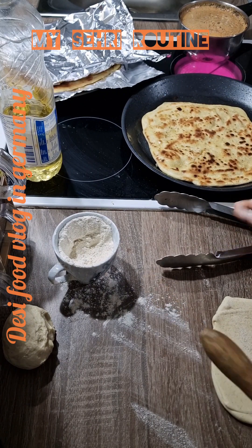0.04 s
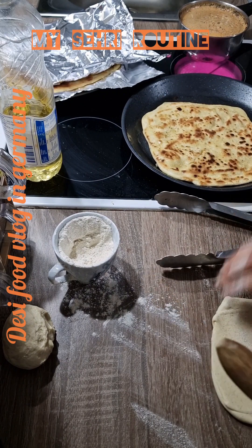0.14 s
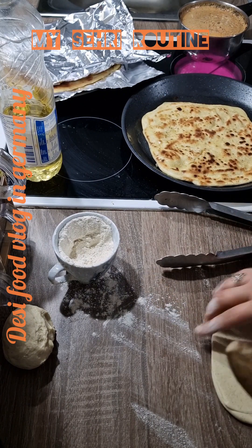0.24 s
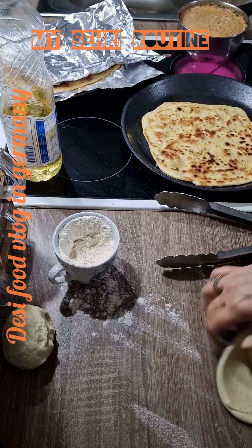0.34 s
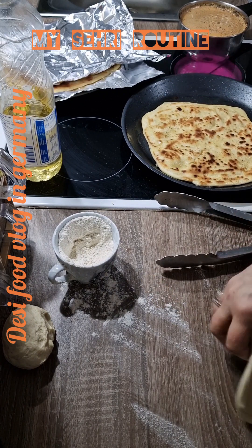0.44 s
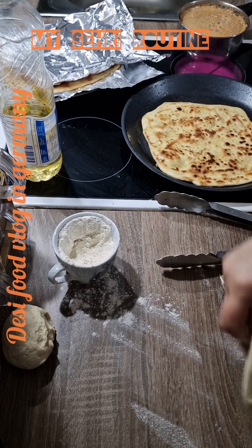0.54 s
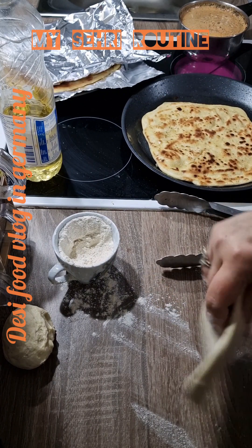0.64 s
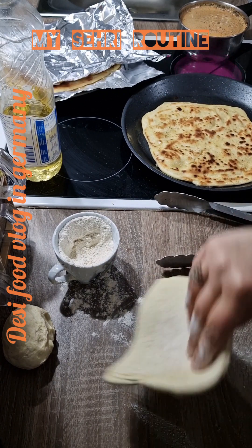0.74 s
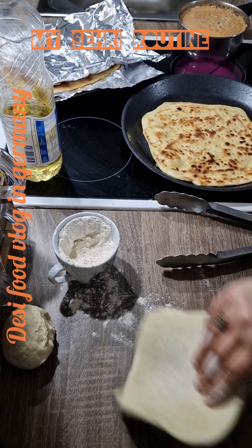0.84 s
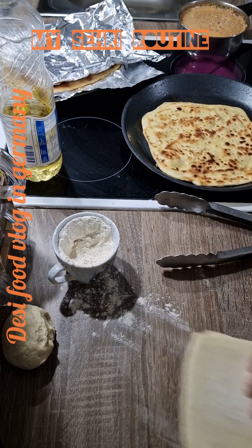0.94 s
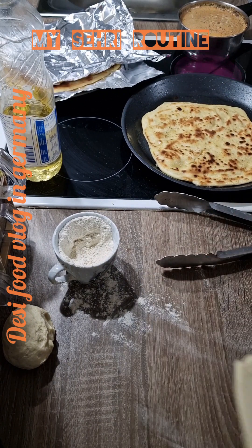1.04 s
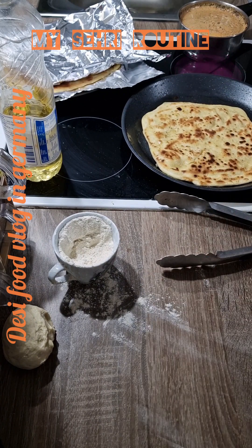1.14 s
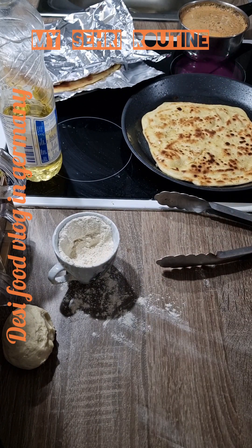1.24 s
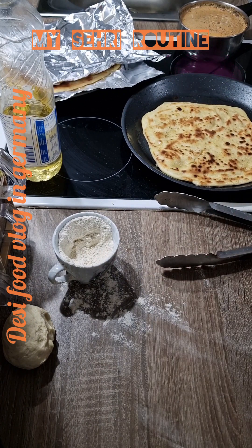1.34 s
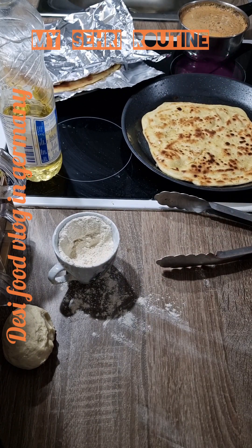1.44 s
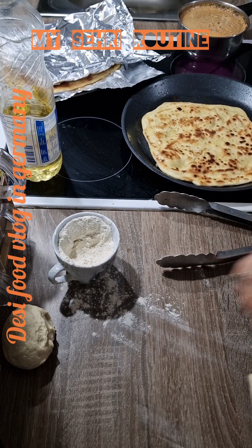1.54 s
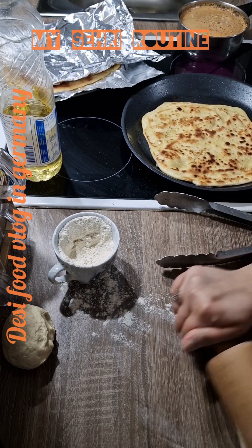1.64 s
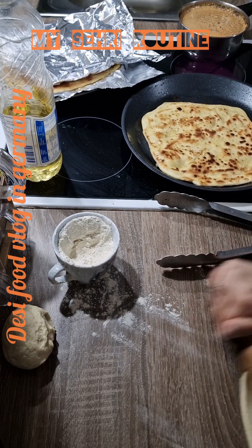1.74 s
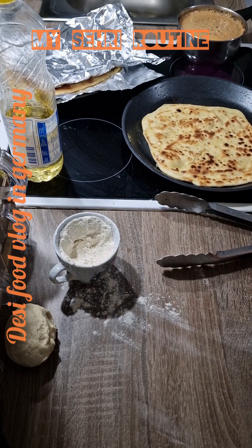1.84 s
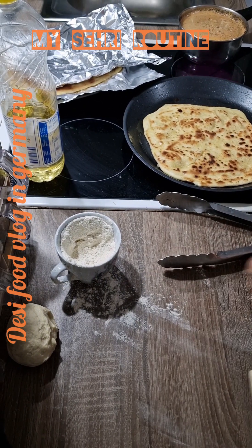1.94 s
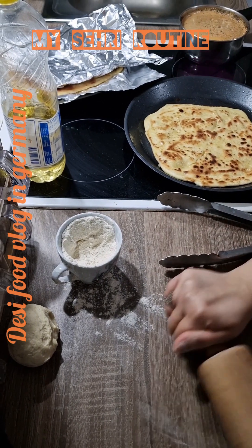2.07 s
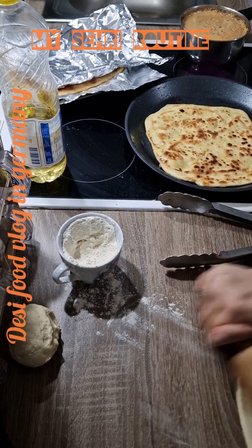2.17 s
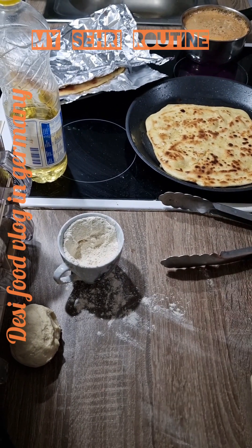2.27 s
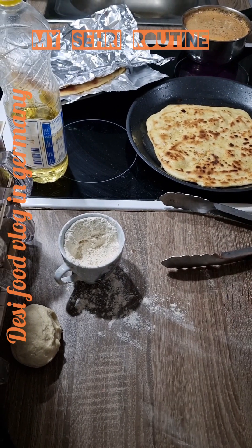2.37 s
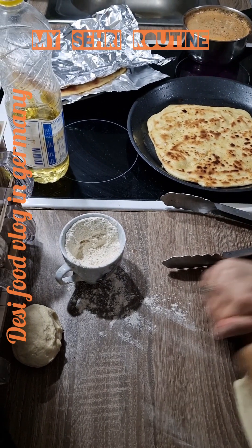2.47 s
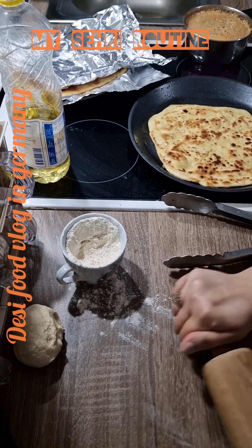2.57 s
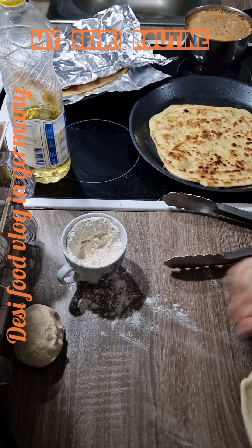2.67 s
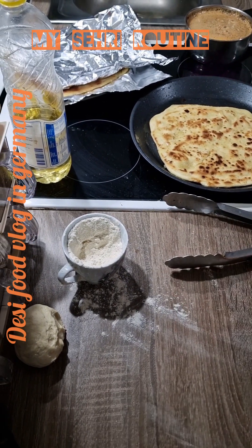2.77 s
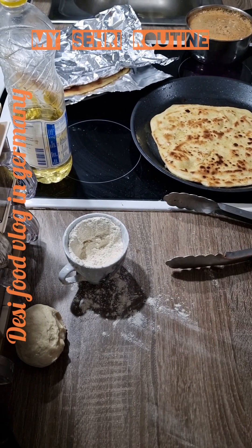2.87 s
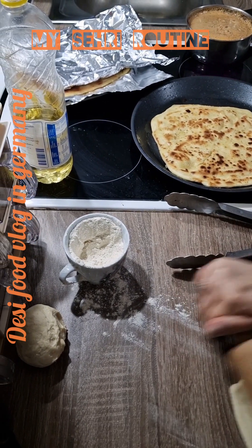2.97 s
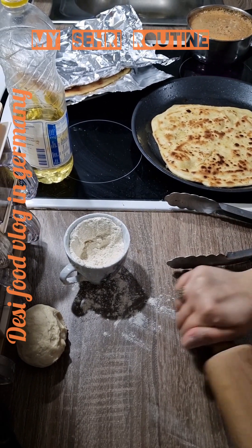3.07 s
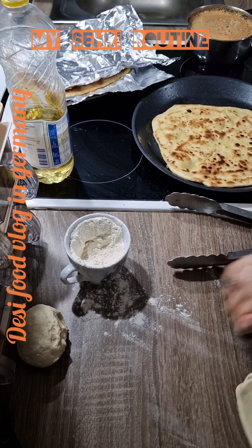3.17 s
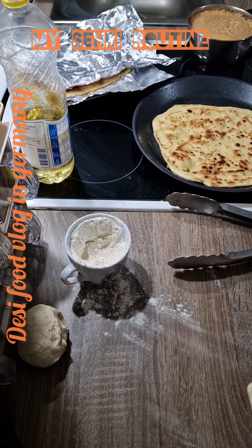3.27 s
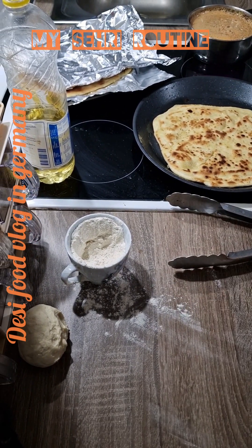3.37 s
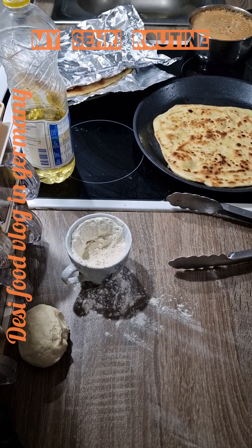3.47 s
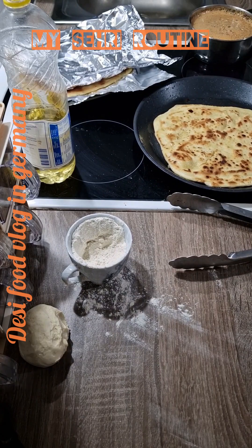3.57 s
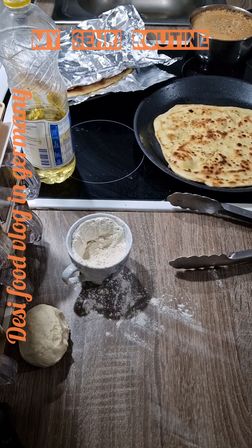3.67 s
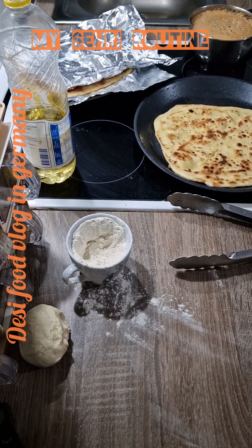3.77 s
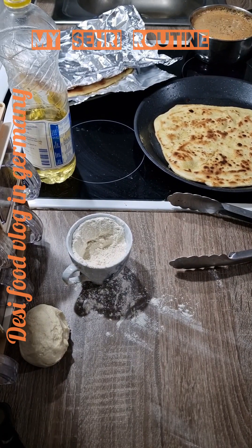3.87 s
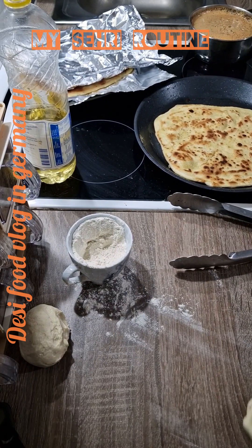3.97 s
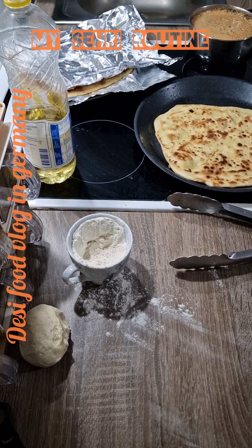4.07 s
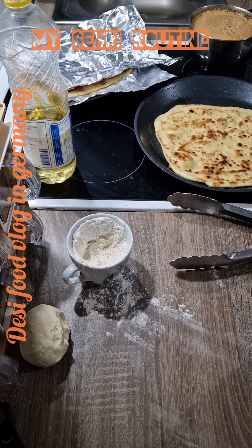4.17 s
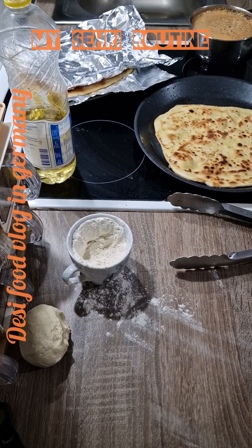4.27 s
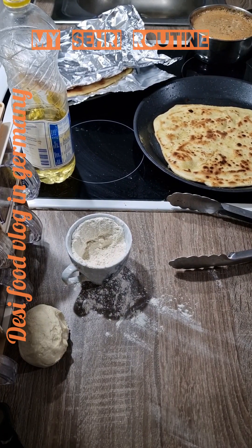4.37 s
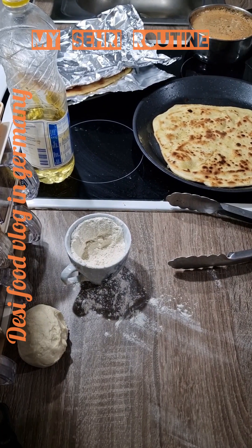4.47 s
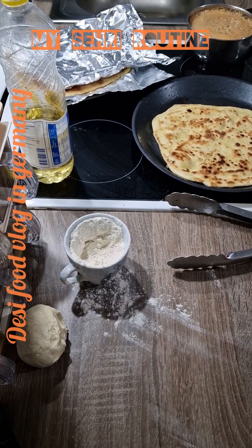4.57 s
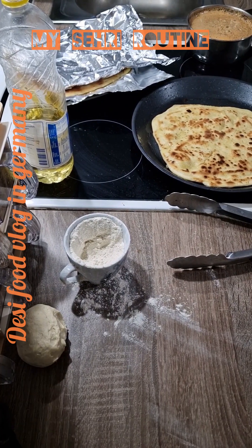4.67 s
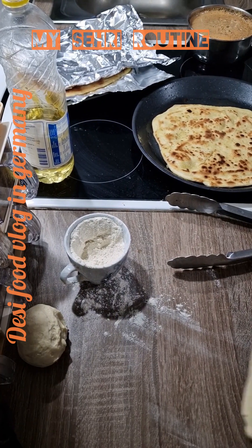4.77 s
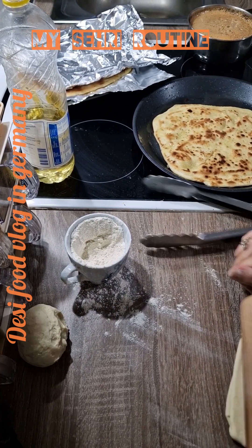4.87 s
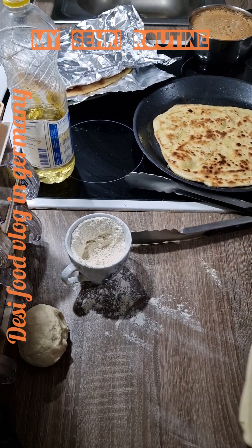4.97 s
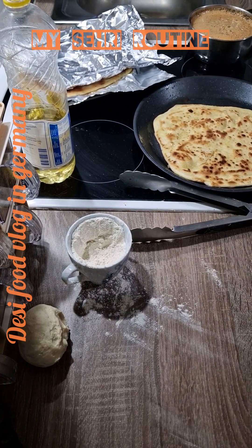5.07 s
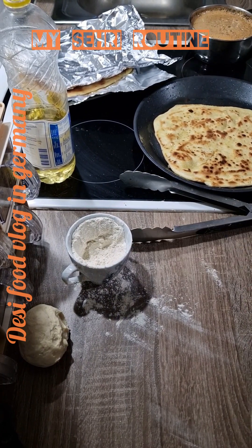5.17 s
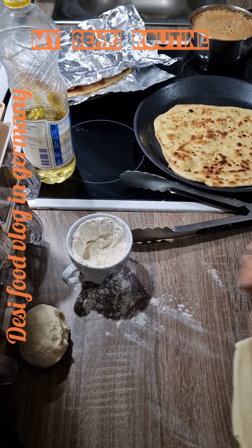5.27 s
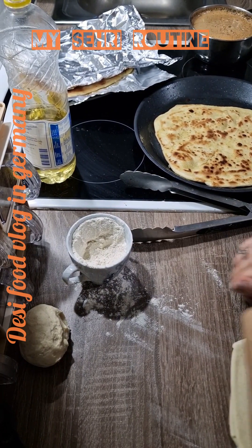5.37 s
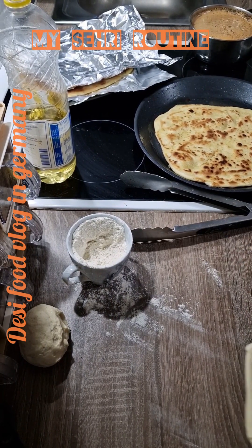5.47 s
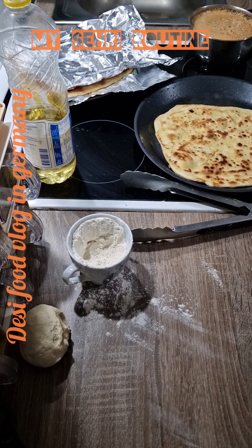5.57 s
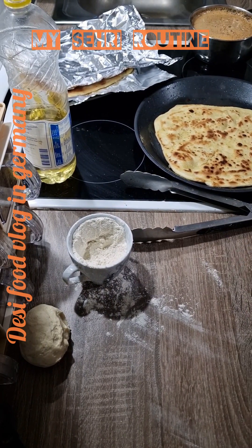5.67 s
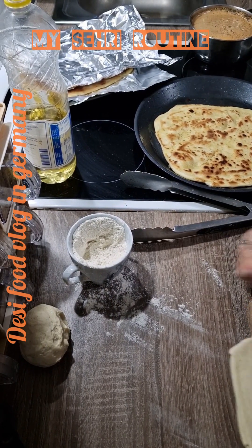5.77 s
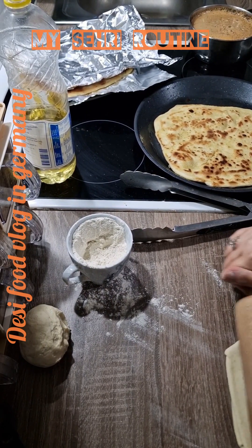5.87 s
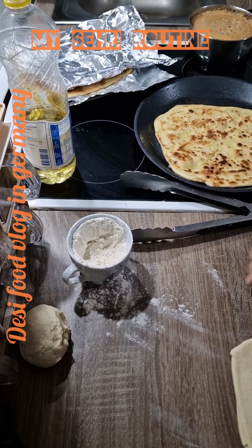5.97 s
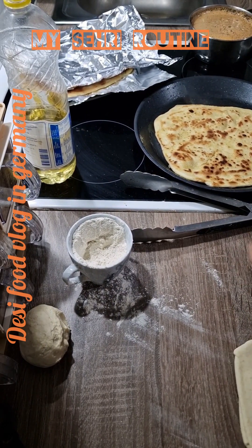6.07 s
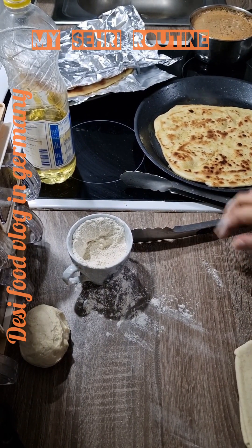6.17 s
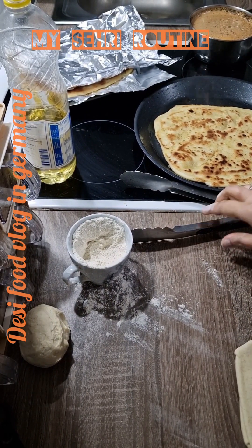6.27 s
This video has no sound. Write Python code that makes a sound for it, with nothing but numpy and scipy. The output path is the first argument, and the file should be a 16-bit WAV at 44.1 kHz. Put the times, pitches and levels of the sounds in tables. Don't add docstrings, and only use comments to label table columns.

```python
import sys
import numpy as np
from scipy import signal
from scipy.fft import rfft, irfft, next_fast_len
from scipy.io import wavfile
from scipy.ndimage import map_coordinates

SR = 44100
rng = np.random.default_rng(int(sys.argv[2]) if len(sys.argv) > 2 else 0)


def ratio_of_db(decibels):
    return 10 ** (np.asarray(decibels, float) / 20)


def wrap_up_sound(samples):
    columns = np.atleast_2d(samples).T
    tamed = np.clip(columns, -1, 1)
    steps = np.round(tamed * 32767).astype(np.int16)
    wavfile.write(sys.argv[1], SR, steps)


N = 278712
TIME = np.arange(N) / SR


def unit(x):
    return x / np.sqrt(np.mean(x ** 2) + 1e-20)


def along(points, hz):
    f, v = np.transpose(points)
    return np.interp(np.log(hz + 1), np.log(f + 1), v)


def level_curve(points):
    s, db = np.transpose(points)
    return ratio_of_db(np.interp(TIME, s, db, -120, -120))


def filtered(x, response):
    m = next_fast_len(x.shape[-1] + SR // 2)
    spectrum = rfft(x, m) * response(np.fft.rfftfreq(m, 1 / SR))
    return irfft(spectrum, m)[..., :x.shape[-1]]


def coloured(x, colour):
    return filtered(x, lambda f: ratio_of_db(along(colour, f)))


def body(modes):
    def response(f):
        total = 0
        for k, (centre, width, db) in enumerate(modes):
            total = total + (-1) ** k * ratio_of_db(db) * 1j * f * width / (centre ** 2 - f * f + 1j * f * width)
        return total
    return response


def band(lo_hz, hi_hz):
    return lambda f: (1j * f / (lo_hz + 1j * f)) ** 2 / (1 + 1j * f / hi_hz) ** 2


def noise_burst(t, t60):
    return ratio_of_db(-60 * t / t60) * rng.standard_normal(len(t))


def grit(lump_ms, depth_db):
    place = TIME / lump_ms * 1e3
    lumps = map_coordinates(rng.standard_normal(int(N / SR / lump_ms * 1e3) + 4), [place])
    return ratio_of_db(depth_db * lumps) * rng.standard_normal(N)


def spread(make, alike):
    def shares(hz):
        turn = np.arccos(np.clip(along(alike, hz), -1, 1)) / 2
        return np.array([np.cos(turn), np.sin(turn)])
    mid, side = filtered(np.array([make(), make()]), shares)
    return unit(np.array([mid + side, mid - side]))


def add(track, s, sound):
    start = round(s * SR)
    track[..., start:][..., :sound.shape[-1]] += sound[..., :track.shape[-1] - start]


def summed(shape, db, step=16):
    t = np.arange(0, N, step) / SR
    return np.interp(TIME, t, np.sqrt(ratio_of_db(2 * db) @ shape(t) ** 2))


def swells(rows, db, power):
    def shape(t):
        progress = np.clip((t - rows[:, :1]) / rows[:, 1:2], 0, 1)
        return np.abs(np.sin(np.pi * progress ** 0.9)) ** power
    return summed(shape, db)


def brushes(rows, db):
    start, end = rows[:, :1], rows[:, :1] + rows[:, 1:2]
    rise_s, fall_s = 0.025, 0.14
    return summed(lambda t: np.clip(np.minimum((t - start) / rise_s, (end - t) / fall_s + .5), 0, 1), db)


def fades(s, db, db_per_s, rise_s):
    def shape(t):
        age = np.maximum(t - s[:, None], 0)
        return ratio_of_db(-db_per_s[:, None] * age) * (1 - np.exp(-age / rise_s))
    return summed(shape, db)


# (start [s], length [s], pressure [dB], flour [dB], wood sliding [dB])
PASSES = [(0.776, 0.27, -55, -67, -62.5), (1.062, 0.091, -50.5, -72, -60.5),
          (1.497, 0.22, -50, -55.5, -50.5), (1.663, 0.22, -48.5, -56.5, -56), (1.887, 0.21, -47, -57, -62),
          (2.112, 0.23, -48.5, -58.5, -63.5), (2.356, 0.22, -45.5, -58, -63.5),
          (2.584, 0.25, -49, -58.5, -63), (2.83, 0.22, -45.5, -58, -61), (3.074, .26, -51.5, -61, -61.5),
          (3.628, .14, -63, -62.5, -61.5), (3.906, 0.13, -58, -63, -64), (4.051, 0.12, -58.5, -62, -51),
          (5.089, 0.26, -51.5, -59.5, -62.5), (5.34, 0.26, -49.5, -59, -65), (5.622, 0.21, -47, -59, -64.5),
          (5.93, 0.28, -71, -69, -82)]
# (frequency [Hz], level [dB])
ROLLING_PUSH = [(50, -17), (85, -0.5), (135, 2.5), (165, 2.5), (205, 3), (300, -3.5), (400, -10),
                (600, -28)]
# (frequency [Hz], width [Hz], level [dB])
COUNTER = [(88.3, 11.4, -5), (134.9, 13.6, 2), (162, 16.8, -7), (201.9, 14.6, -4.5), (294.8, 25, -6.5),
           (325, 30.6, -9.5), (362.3, 33, -17), (398, 28.7, -14), (485, 36.6, -18.5)]


def pressing():
    passes = np.array(PASSES)
    press = swells(passes, passes[:, 2], power=2.35)
    lumps = coloured(grit(lump_ms=10, depth_db=2.1), ROLLING_PUSH)
    steady = filtered(lumps, body(COUNTER))
    return ratio_of_db(-1.0) * filtered(press * lumps, body(COUNTER)) / np.std(steady)


# (start [s], length [s], flour [dB], wood sliding [dB])
RUBS = [(-.05, 0.24, -68, -59.5), (0.211, 0.066, -59, -53), (0.303, 0.039, -52.5, -51),
        (0.356, 0.43, -63, -55), (0.849, 0.27, -55.5, -64), (1.14, 0.32, -72, -61.5),
        (1.356, 0.15, -64.5, -57), (3.275, 0.16, -62.5, -61), (3.413, 0.23, -69, -60),
        (3.74, 0.13, -66, -68), (3.843, 0.16, -62, -60.5), (4.117, 0.24, -63, -65.5), (4.3, 0.45, -68, -72),
        (4.615, .03, -61, -68), (4.678, 0.39, -58, -61), (5.814, 0.28, -67, -75), (6.078, 0.35, -65.5, -72)]
# (frequency [Hz], level per Hz [dB])
FLOUR = [(880, -23), (1500, 6.5), (1790, 5.5), (2060, 4.5), (2660, 1.5), (2970, 2), (7540, 3.5),
         (15100, -6.5), (16000, -18)]
# (frequency [Hz], width [Hz], level [dB])
PIN = [(400, 43, -4), (673, 140, -1), (1350, 134, -0.5), (2052, 140, 2), (3400, 300, -6), (4460, 190, -4)]


def rubbing():
    passes, rubs = np.array(PASSES), np.array(RUBS)
    hiss = np.hypot(swells(passes, passes[:, 3], power=0.88), brushes(rubs, rubs[:, 2]))
    slide = np.hypot(swells(passes, passes[:, 4], power=0.59), brushes(rubs, rubs[:, 3]))
    flour = spread(lambda: coloured(grit(lump_ms=3, depth_db=1.65), FLOUR), [(1000, 0.056), (10000, 0.013)])
    wood = spread(lambda: filtered(grit(lump_ms=20, depth_db=2.5), body(PIN)), [(500, 0.6), (3000, 0.083)])
    return ports(ratio_of_db(3.0) * hiss * flour + ratio_of_db(-1.0) * slide * wood, lag_ms=0.19)


# (time [s], middle tones [dB], deep tones [dB], upper tones [dB], slap [dB])
THUDS = [(0.225, -30.5, -44, -49, -62), (0.236, -44, -32, -29, -30.5), (0.318, -43, -41, -48, -34),
         (0.833, -47, -62, -44.5, -43), (0.864, -76, -39.5, -36, -63), (1.07, -50.5, -56, -55, -62),
         (1.086, -38.5, -65, -46, -28), (1.131, -71, -71, -58, -61), (1.457, -44, -49, -49, -50),
         (1.469, -31.5, -29.5, -31, -32), (3.388, -36, -47, -40.5, -20.5), (3.566, -33, -49, -29.5, -33),
         (3.651, -44.5, -57, -39, -31), (3.661, -54, -62, -44.5, -42), (4.295, -33, -65, -40.5, -25.5),
         (4.334, -51, -55, -54, -57), (4.533, -60, -79, -51.5, -45), (4.636, -42, -30.5, -59, -41),
         (4.664, -56, -31.5, -60, -52), (4.789, -22.5, -32, -16.5, -8.5), (4.873, -21, -35, -19.5, -3.5),
         (4.62, -54, -73, -55, -40), (6.287, -60, -80, -56, -42), (5.045, -61, -70, -52, -63),
         (4.711, -48, -65, -58, -60), (4.745, -43, -65, -48, -58), (0.88, -61, -60, -47, -65),
         (5.97, -54, -66, -73, -70)]
# (time [s], peak [dB], upper tones [dB])
BUMPS = [(1.991, -45, -10), (2.18, -43, -14), (2.449, -40, -20), (2.695, -39, -13), (2.949, -42.5, -6),
         (3.6, -40, -16), (5.259, -42.5, -9), (5.39, -43.5, -8), (5.523, -45, -6), (5.703, -45, -19)]


def thuds():
    out, t = np.zeros(N), np.arange(SR // 2) / SR
    bumps = [(s, db - 2.5, db - 9, db - 2.5 + upper_db, db - 13) for s, db, upper_db in BUMPS]
    push = 1 - np.exp(-t / .004)
    for s, db, deep_db, upper_db, slap_db in THUDS + bumps:
        weight = [(70, deep_db + 0.5), (100, deep_db + 9.0), (125, db), (210, db - 6.5),
                  (270, upper_db), (340, upper_db + 4.0), (520, upper_db)]
        ring = np.zeros(len(t))
        for hz, width, level in COUNTER:
            detuned = hz * (1 + 0.02 * rng.normal())
            fade = ratio_of_db(along(weight, hz) + level - 29.0 * width * t)
            ring += fade * np.sin(2 * np.pi * detuned * t)
        slap = filtered(noise_burst(t, 0.027), lambda f: band(600, 2400)(f) ** 2)
        slap *= 1 - np.exp(-t / 0.0022)
        add(out, s, ratio_of_db(4.0) * ring * push + ratio_of_db(slap_db + 11.0) * slap)
    return filtered(out, lambda f: band(50, 9000)(f) ** 2)


# (time [s], left over right [dB])
KNOCK_AT = [(0.3165, -6), (0.3245, -6), (1.472, -4), (3.388, -4), (1.539, -4)]
# (peak [dB], crack [dB])
KNOCKS = [(-39, -16), (-42.5, -6.5), (-21, -26.5), (-33, -26), (-44, -30)]
# (frequency [Hz], level [dB], time to fall 60 dB [s])
KNOCK_MODES = [
    [(1498, -4, 0.04), (2020, -2, 0.023), (3200, -15, .03), (4500, -15, .03), (5500, -15, .02)],
    [(1490, 2, 0.03), (2210, 8, 0.02), (3250, -6, 0.048), (5370, -8, .02)],
    [(1254, 0.5, 0.025), (1670, 10, 0.013), (1795, 4.5, 0.015), (2360, -1, 0.027), (2686, -7, 0.025),
     (3220, -4, 0.033), (3336, 4.5, 0.033), (3490, -5, 0.03), (4620, -7.5, 0.022), (7560, -11, .02)],
    [(1150, 2, 0.018), (1625, 8, 0.015), (2140, 8, 0.016), (2570, 0, 0.014), (3034, 2, 0.038),
     (3240, -1, 0.027), (4500, -10, .012)],
    [(1300, -4, .03), (2360, -6, .02), (3400, 4, 0.034)],
]


def knocks():
    out, t = np.zeros((2, N)), np.arange(SR // 4) / SR
    rise = 1 - np.exp(-t / .0006)
    for (s, pan_db), (db, crack_db), modes in zip(KNOCK_AT, KNOCKS, KNOCK_MODES):
        ring = sum(ratio_of_db(level - 60 * t / t60) * np.sin(2 * np.pi * hz * t) for hz, level, t60 in modes)
        clack = ratio_of_db(11.5) * filtered(noise_burst(t, 0.013), band(840, 2400))
        crack = ratio_of_db(crack_db + 20.5) * filtered(noise_burst(t, 0.013), band(4200, 12000))
        chatter = filtered(rng.standard_normal(len(t)), band(560, 2350))
        chatter *= ratio_of_db(-2.5 - 60 * t / 0.074)
        wide_modes = [(hz, 260, level) for hz, level, _ in modes]
        buzz = unit(filtered(rng.standard_normal(len(t)), body(wide_modes)))
        buzz *= ratio_of_db(-8.5 - 60 * t / 0.063)
        pan = ratio_of_db(db - 0.5 + pan_db * np.array([[.5], [-.5]]))
        add(out, s, pan * (ring + clack + crack + chatter + buzz) * rise)
    return out


# (time [s], level [dB])
SCRAPE = [(3.9912, -79), (3.992, -33), (4.003, -33), (4.02, -34.5), (4.033, -38), (4.037, -31.5),
          (4.048, -32.5), (4.058, -32), (4.078, -32.5), (4.09, -41), (4.104, -35), (4.116, -50),
          (4.128, -71), (4.148, -54), (4.16, -70)]
# (frequency [Hz], level per Hz [dB])
SCRAPE_COLOUR = [(180, -65), (300, -21), (470, -26), (555, -29), (678, -10.5), (814, -12.5), (1410, -0.5),
                 (1660, -10.5), (3760, -10), (5900, -25.5), (7690, -17.5), (9390, -33.5), (16000, -40)]
# (frequency [Hz], width [Hz], level [dB])
SCRAPE_RING = [(1050, 43, 1), (1298, 16, 3), (1430, 23, 8), (2140, 22, 4), (2226, 54, 2), (2715, 43, 5.5),
               (3330, 100, -12), (3740, 120, 4), (4310, 43, -15), (7700, 190, -29), (8200, 170, -16)]
# (time [s], peak [dB])
CATCHES = [
    (3.992, -31.5),
    (4.0162, -44),
    (4.0368, -37),
    (4.057, -43),
    (4.0755, -40),
]


def scrape():
    def edge():
        drive = grit(lump_ms=1.2, depth_db=2)
        return unit(coloured(drive, SCRAPE_COLOUR)) + 0.72 * unit(filtered(drive, body(SCRAPE_RING)))
    out = ratio_of_db(0.5) * level_curve(SCRAPE) * spread(edge, [(1500, 0.45), (5000, 0.2)])
    t = np.arange(SR // 20) / SR
    for s, db in CATCHES:
        snag = filtered(rng.standard_normal(len(t)), band(900, 7800))
        add(out, s, ratio_of_db(db + 5.0 - 60 * t / 0.01) * snag)
    return out


# (time [s], rattle [dB], grind [dB], sizzle [dB], fade [dB/s])
SHOVES = [
    (4.7856, -24, -39.5, -68, 80),
    (4.857, -28, -42, -44, 69.5),
]
# (frequency [Hz], width [Hz], level [dB])
RATTLE = [(269, 68, 1), (328, 42, 3.5), (408, 32, 3.5), (488, 25, 4.5), (624, 25, 3), (717, 26, 8),
          (824, 45, -1), (1043, 48, 2.5), (1180, 35, 4.5), (1516, 33, -6), (2050, 67, -7), (2280, 80, -15)]
# (frequency [Hz], width [Hz], level [dB])
SLAM = [(288, 33, 1.5), (416, 23, 4), (491, 26, -3), (755, 40, 6), (840, 65, 1), (930, 43, 3.5),
        (1016, 36, 5.5), (1130, 47, 3), (1297, 50, 2.5), (1634, 40, -7), (1740, 44, -5), (1910, 35, -7.5),
        (2200, 43, -8.5), (2330, 60, -10.5)]


def shoving():
    at, rattle_db, grind_db, sizzle_db, fade = np.transpose(SHOVES)
    drive = grit(lump_ms=1.5, depth_db=5)
    grind = fades(at, grind_db, 1.26 * fade, rise_s=0.0025) * unit(filtered(drive, band(1500, 3800)))
    sizzle = fades(at, sizzle_db, 9.5 * fade, rise_s=0.0025) * unit(filtered(drive, band(4000, 12000)))
    shove = fades(at[:1], rattle_db[:1], fade[:1], rise_s=0.0023)
    slam = fades(at[1:], rattle_db[1:], fade[1:], rise_s=0.0023)
    shove = shove * ratio_of_db(-620 * np.maximum(TIME - at[1], 0))
    broad = 0.5 * unit(filtered(drive, band(133, 940)))
    buzz = shove * unit(unit(filtered(drive, body(RATTLE))) + broad)
    buzz += slam * unit(unit(filtered(drive, body(SLAM))) + broad)
    low = filtered(buzz, lambda f: 1 / (1 + (f / 900) ** 2))
    resting = np.maximum(TIME - 5.023, 0)
    low_rest, high_rest = ratio_of_db(-200 * resting), ratio_of_db(-570 * resting)
    return low_rest * low + high_rest * (buzz - low + grind) + sizzle


# (time [s], peak [dB], body [dB], ring [dB])
CLACKS = [(3.6079, -30, -33, -9.5), (4.6817, -45, -22, -6), (4.787, -32.5, 13, -13),
          (4.795, -30.5, 11, -12), (4.803, -41, 16, -4), (4.811, -42, 17, -2), (4.82, -35.5, 15, -15),
          (4.832, -44, 18, -4), (4.8579, -10.5, 4, -7.5), (4.8605, -16, 1.5, -7), (4.866, -31, 12, -14),
          (4.874, -22, -6, 2.5), (4.879, -28, 9.5, -10), (4.885, -34, 8, -8), (4.9, -34, 13, -8),
          (4.92, -40, 8, -9), (4.941, -43, 14, -9), (5.1316, -46, -2, -6)]
# (frequency [Hz], level [dB], time to fall 60 dB [s])
STEEL = [(4960, 1, .012), (6480, -2, 0.0066), (7600, -4, 0.011), (8440, 2, 0.013), (9370, -8, .006),
         (11500, 4, 0.0077), (13200, -18, 0.0049), (15300, -3, .006)]


def clacks():
    out, t = np.zeros(N), np.arange(SR // 8) / SR
    for s, db, body_db, ring_db in CLACKS:
        ring = np.zeros(len(t))
        for hz, level, t60 in STEEL:
            detuned = hz * (1 + 0.04 * rng.normal())
            ring += ratio_of_db(level + rng.normal(0, 2) - 60 * t / t60) * np.sin(2 * np.pi * detuned * t)
        crack = filtered(noise_burst(t, 0.014), band(2500, 19000))
        knock = filtered(noise_burst(t, 0.024), band(810, 2670))
        add(out, s, ratio_of_db(db - 3.5) * (ratio_of_db(ring_db) * ring + crack + ratio_of_db(body_db + 11.5) * knock))
    return out


# (time [s], level [dB])
LEANS = [(.42, -77), (.95, -83), (1.46, -63), (1.88, -57), (2.28, -64), (2.83, -72), (4.57, -77),
         (4.8, -71), (5.24, -80), (5.62, -76)]


def cupboard():
    at, db = np.transpose(LEANS)
    shake = ratio_of_db(-87.5) + fades(at, db + 0.5, np.full(len(at), 60 / 0.97), rise_s=0.025)
    return ratio_of_db(7.0) * shake * spread(lambda: filtered(rng.standard_normal(N), band(25, 45)), [(30, 0.59)])


# (frequency [Hz], left over right [dB])
TILT = [(35, 3), (75, -1.5), (130, -2), (300, 5.5), (1400, -3), (3000, 1.5), (8000, -1), (14000, 16.5)]
# (frequency [Hz], share [0-1])
LEAD = [(300, 0), (1000, 1)]


def ports(x, lag_ms):
    def both(f):
        half = ratio_of_db(along(TILT, f) / 2) * np.exp(-1j * np.pi * f * along(LEAD, f) * lag_ms / 1e3)
        return np.array([half, 1 / half])
    return filtered(x, both)


# (frequency [Hz], time to fall 60 dB [s])
KITCHEN = [(150, 0.32), (1000, 0.24), (4000, 0.27), (12000, 0.23)]
# (frequency [Hz], likeness [-1 to 1])
NEAR_ALIKE = [(40, .4), (90, 0.94), (150, 1), (250, 0.99), (600, 0.2), (1500, 0.034)]


def kitchen(x):
    noise = spread(lambda: rng.standard_normal(N), NEAR_ALIKE)[:, :SR * 3 // 4]
    hz, t, z = signal.stft(noise, SR, nperseg=256)
    tail = signal.istft(z * ratio_of_db(-60 * t / along(KITCHEN, hz)[:, None]), SR, nperseg=256)[1]
    late = np.pad(x, (150, 0))[None]
    return signal.fftconvolve(late, tail / np.linalg.norm(tail[0]), axes=1)[:, :N]


# (time [s], level [dB])
AIR_DRIFT = [(0, -0.5), (1.8, 1.5), (3.5, 0.5), (4.7, -0.5), (5.8, 0), (6.33, -3.5)]
# (frequency [Hz], level per Hz [dB])
AIR = [(12, -37), (20, -21), (134, 1.5), (222, -13.5), (301, -2.5), (542, -20.5), (678, -12.5),
       (1370, -5.5), (1530, -23.5), (2080, -10.5), (2910, -12.5), (7520, -10), (10800, -17.5),
       (14700, -10.5), (16000, -14.5)]
# (frequency [Hz], likeness [-1 to 1])
AIR_ALIKE = [(60, 0.91), (240, 0.8), (950, 0.23), (3770, -0.35), (15000, 0.078)]


def room_tone():
    air = spread(lambda: coloured(rng.standard_normal(N), AIR), AIR_ALIKE)
    return ratio_of_db(-57.5) * level_curve(AIR_DRIFT) * air


def scene():
    low, pin, edge = pressing() + thuds(), knocks(), scrape()
    steel = shoving() + clacks()
    near = ports(low + pin + edge, lag_ms=0.22) + ports(steel, lag_ms=-0.14)
    wet = ratio_of_db(-8.0) * kitchen(low) + ratio_of_db(-7) * kitchen(edge[0])
    wet += ratio_of_db(-6.5) * kitchen(pin.mean(axis=0)) + ratio_of_db(-3.0) * kitchen(steel)
    return near + wet + rubbing() + cupboard() + room_tone()


def band_limit(x):
    return signal.sosfilt(signal.butter(12, 17160, fs=SR, output="sos"), x)


# (frequency [Hz], level [dB])
BAND_TOP = [(15750, 0), (16000, -14), (16500, -13), (17000, -52), (17300, -90)]


def record(dry):
    limited = coloured(dry, BAND_TOP)
    return band_limit(limited)


dry = scene()
out = record(dry)
wrap_up_sound(out)
```